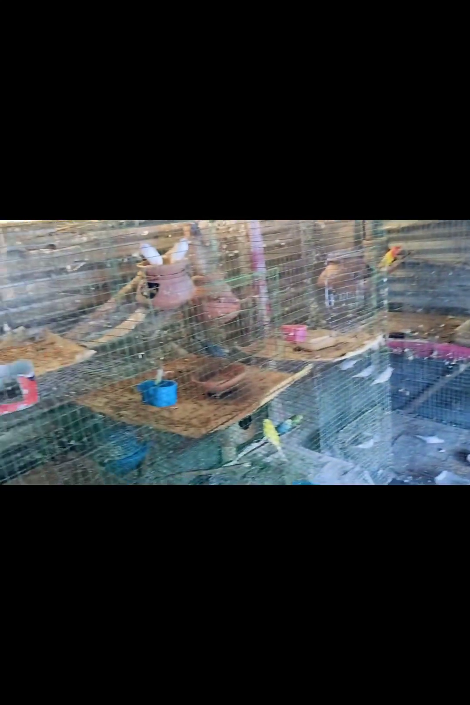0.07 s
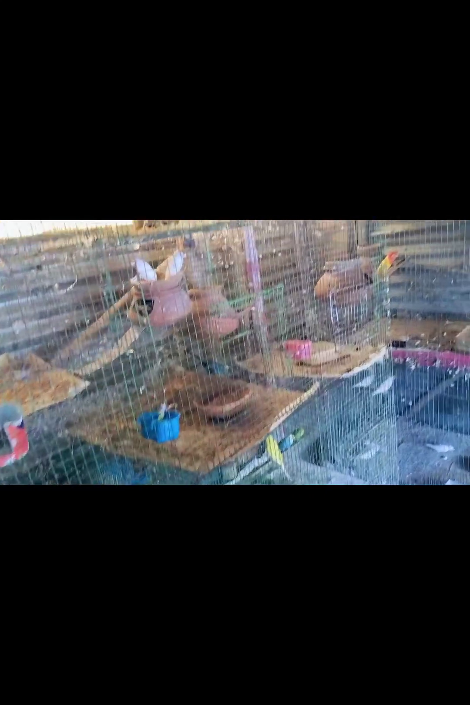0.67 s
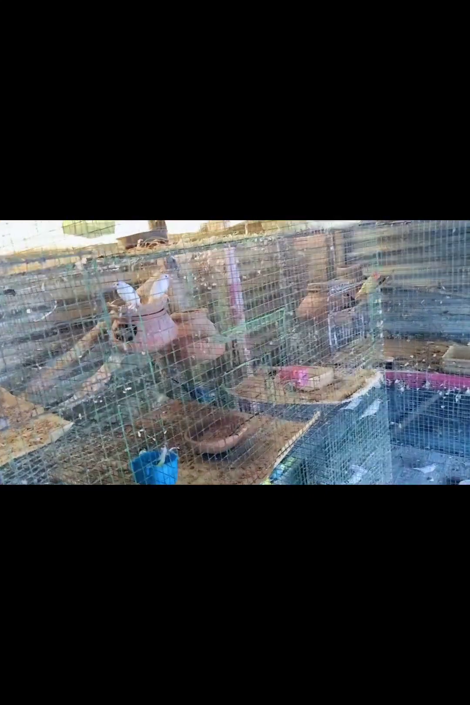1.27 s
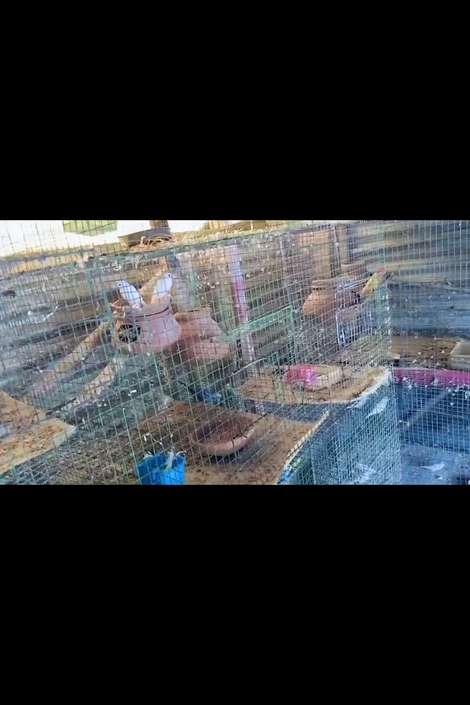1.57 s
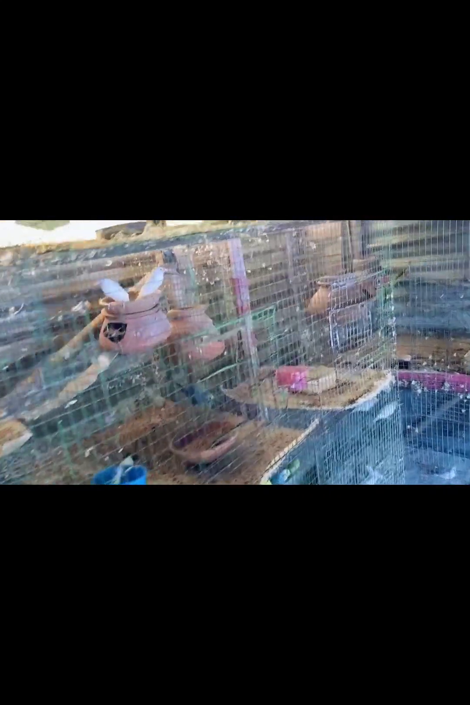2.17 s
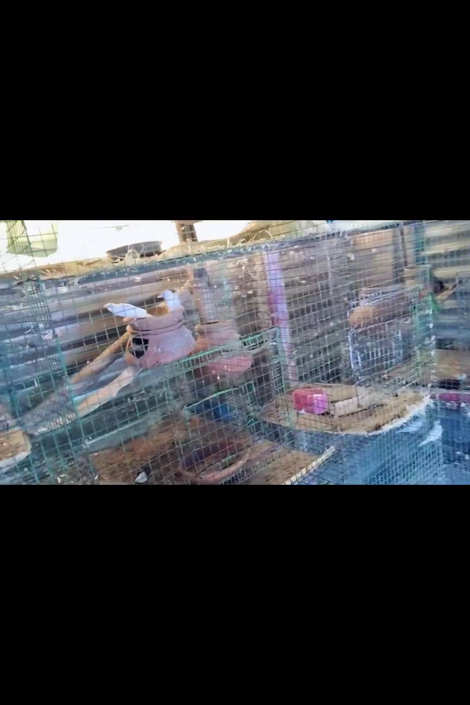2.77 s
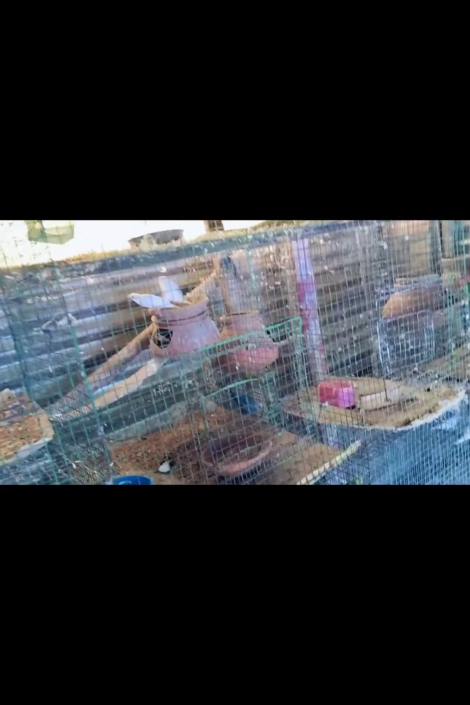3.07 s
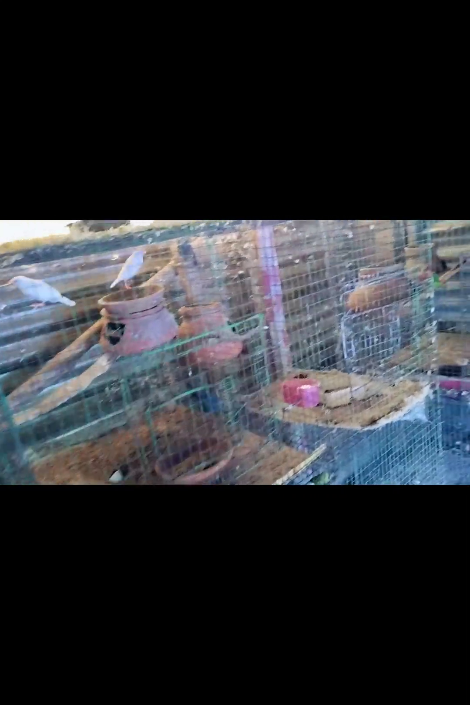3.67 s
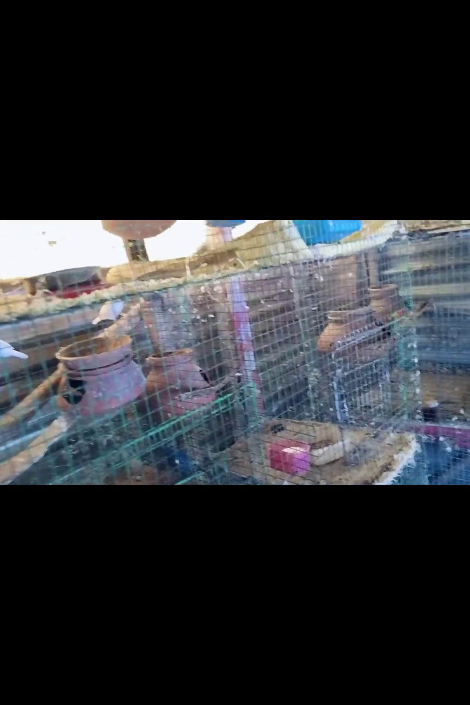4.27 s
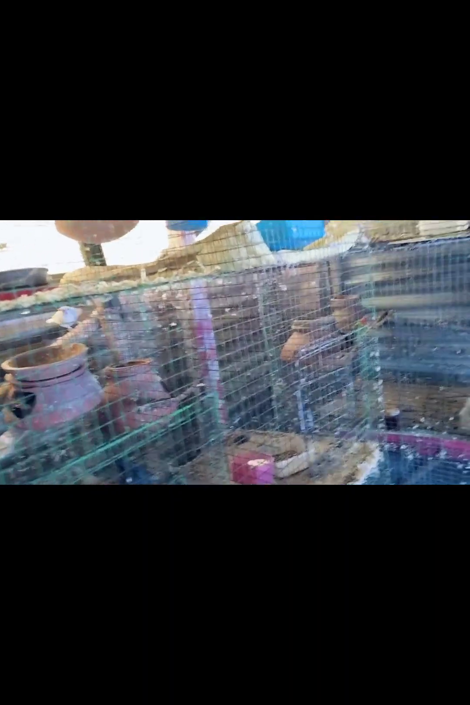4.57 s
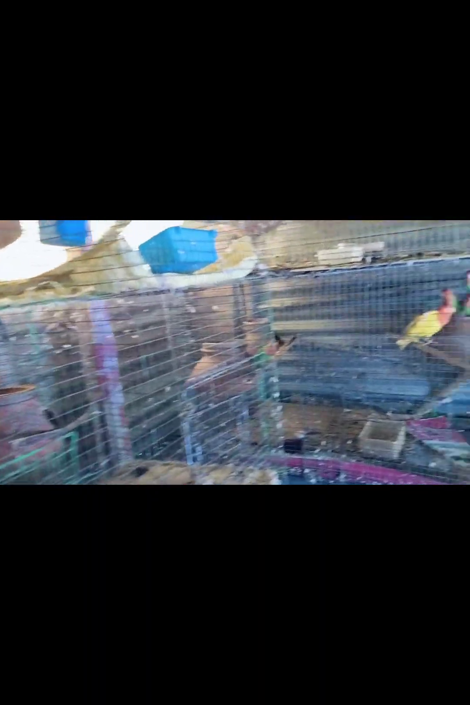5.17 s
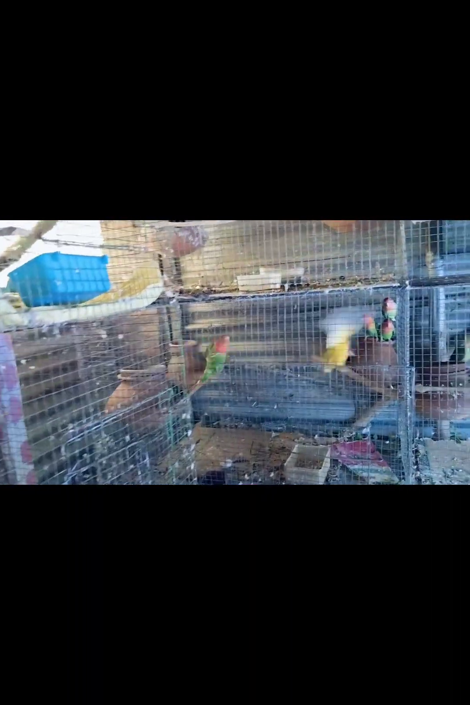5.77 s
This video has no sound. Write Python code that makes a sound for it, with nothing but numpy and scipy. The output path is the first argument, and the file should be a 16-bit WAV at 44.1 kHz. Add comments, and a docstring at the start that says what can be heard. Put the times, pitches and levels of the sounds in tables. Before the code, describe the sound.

Small parrots chirp, squawk and twitter in short high bursts in an outdoor aviary, over a faint low engine throb and a few soft knocks.

```python
"""Lovebirds in an outdoor aviary

Shrill double chirps, a thin whistle, buzzy squawks and raspy chips lead to a twittering run of peeps
and chatter. Each call is a membrane tone, coloured by throat and beak, that echoes in a cage of wire
mesh and sheet metal. Knocks, clicks and low handling thumps come between. Underneath lie a rumble that
swells with handling, grainy hiss, soft air, a hollow drone and the throb of a slow, distant engine."""
import sys
import numpy as np
from scipy import signal
from scipy.fft import rfft, irfft, next_fast_len
from scipy.io import wavfile

SR = 44100
rng = np.random.default_rng(int(sys.argv[2]) if len(sys.argv) > 2 else 0)


def digitize_waveform(pressure):
    """Quantize a signal to 16-bit integers and store it at the path in sys.argv[1].

    Rows of a 2-D input are taken as channels; values are limited to [-1, 1].
    """
    field = np.atleast_2d(pressure).T
    bounded = np.clip(field, -1, 1)
    quanta = np.round(bounded * 32767).astype(np.int16)
    wavfile.write(sys.argv[1], SR, quanta)


N = 264908
TIME = np.arange(N) / SR
CUTOFF_HZ = 15900


def from_db(db):
    """Decibels to gain."""
    return 10 ** (np.asarray(db) / 20)


def rms_one(x):
    """Scale to rms 1."""
    return x / np.sqrt(np.mean(x ** 2) + 1e-20)


def pan(db):
    """Stereo gains that put the left channel db above the right."""
    return from_db([[db / 2], [-db / 2]])


def at_hz(points, hz):
    """Read a spectrum on a log-frequency axis."""
    f, db = np.transpose(points)
    return np.interp(np.log(np.maximum(hz, 1)), np.log(f), db)


def progress(length):
    """Runs from 0 to 1 over a call."""
    return np.linspace(0, 1, int(length * SR))


def phase_of(hz):
    """Running phase of a moving frequency."""
    return 2 * np.pi * np.cumsum(hz) / SR


def add(out, start, sound):
    """Mix in a stereo sound; start is in seconds."""
    i = max(round(start * SR), 0)
    out[:, i:i + sound.shape[1]] += sound[:, :N - i]


def wobble(hz, size):
    """Random motion no faster than about hz; spread 1."""
    lowpass = signal.butter(2, min(hz, SR / 3), fs=SR, output="sos")
    run_in = SR // 10
    white = rng.standard_normal(run_in + max(size, SR // 4))
    return rms_one(signal.sosfilt(lowpass, white)[run_in:][:size])


def noise(spectrum, size=N):
    """Coloured stereo noise, centred in the bass and wide in the treble."""
    padded = next_fast_len(max(size, SR // 4))
    hz = np.arange(padded // 2 + 1) * SR / padded
    alike = 0.91 / (1 + (hz / 850) ** 2)
    mid, side = rfft(rng.standard_normal((2, padded)))
    stereo = np.sqrt(1 + alike) * mid + np.sqrt(1 - alike) * side * [[1], [-1]]
    return rms_one(irfft(stereo * from_db(at_hz(spectrum, hz)), padded)[:, :size])


def swelling(steady_db, rows):
    """Gain of a steady level with bell-shaped swells on top."""
    swells = (from_db(db) * np.exp(-((TIME - middle) / width) ** 2) for middle, width, db in rows)
    return np.sqrt(from_db(steady_db) ** 2 + sum(swell ** 2 for swell in swells))


# EQ curves of the four background beds: f/Hz, level/dB
RUMBLE_EQ = [(20, -6), (40, -7), (75, -3.5), (110, 3.5), (200, -21), (400, -41)]
AIR_EQ = [(130, -24), (230, 0.5), (340, -10), (430, -7.5), (530, -12), (680, -5), (1060, -9), (1540, -9),
          (4760, -19.5), (6500, -20.5), (15000, -65)]
DRONE_EQ = [(200, -24.5), (290, -5.5), (345, -17), (410, 2), (460, -11), (560, -24), (1000, -36)]
HISS_EQ = [(1500, -1), (3000, -0.5), (6000, -2), (9000, -16.5), (12000, -16), (16000, -38.5)]
# swells of handling rumble and of the drone near 400 Hz: peak t/s, half width/s, level/dB
RUMBLE_SWELLS = [(.4, .25, -52.5), (1.82, 0.13, -44), (2.15, .14, -49), (4.82, .05, -49),
                 (6.0, 0.11, -50.5)]
DRONE_SWELLS = [(2.09, .035, -43.5), (2.37, 0.052, -57.5), (3.62, 0.32, -60.5), (5.93, 0.25, -52)]
# hiss and air swell and fade together: peak t/s, half width/s, hiss level/dB, air level/dB
HISS_SWELLS = [(0.05, 0.23, -55.5, -58), (1.37, 0.11, -54, -52.5), (2.11, 0.19, -51, -64),
               (2.75, 0.24, -53.5, -76), (3.22, .06, -53, -54.5), (3.7, 0.36, -55, -59),
               (4.27, 0.086, -53.5, -52), (5.87, 0.094, -48, -48.5)]


def ambience(rumble_db=-57, air_db=-57, drone_db=-71, hiss_db=-77.5, grain_db=3):
    """Low rumble that swells with handling; soft air, a hollow drone and grainy hiss come and go."""
    middle, width, hiss_peak_db, air_peak_db = np.transpose(HISS_SWELLS)
    grains = rms_one(noise(HISS_EQ) * from_db(grain_db * wobble(60, N)))
    hiss = grains * swelling(hiss_db, zip(middle, width, hiss_peak_db))
    air = noise(AIR_EQ) * swelling(air_db, zip(middle, width, air_peak_db))
    rumble = noise(RUMBLE_EQ) * swelling(rumble_db, RUMBLE_SWELLS)
    drone = noise(DRONE_EQ) * swelling(drone_db, DRONE_SWELLS)
    return rumble + air + drone + hiss


# the engine's speed and level ride: t/s, firing rate/Hz, level/dB
ENGINE_RIDE = [(0, 19.65, -49), (2.4, 16.6, -53), (3.5, 16.45, -46), (5.3, 17.1, -49.5), (6.01, 17.6, -48)]
# exhaust resonances: f/Hz, bandwidth/Hz, relative level/dB
EXHAUST_MODES = [(144.8, 34.2, 0.5), (415.5, 27, -25.5)]
# swells in the throb: peak t/s, half width/s, level/dB
ENGINE_SURGES = [(0.999, 0.081, -42.5), (2.598, 0.33, -54), (3.05, 0.41, -50.5)]


def engine(uneven_db=2, pan_db=-3, churn=0.017):
    """Each firing thumps the exhaust resonances; distance leaves only the low throb."""
    times, rates, levels = np.transpose(ENGINE_RIDE)
    firing_hz, db = np.interp(TIME, times, rates), np.interp(TIME, times, levels)
    firings = np.diff(np.floor(np.cumsum(firing_hz) / SR), prepend=0)
    drive = firings * from_db(uneven_db * rng.standard_normal(N)) + churn * rng.standard_normal(N)
    throb = np.zeros(N)
    for hz, width, mode_db in EXHAUST_MODES:
        b, a = signal.iirpeak(hz, hz / width, fs=SR)
        throb += from_db(mode_db) * rms_one(signal.lfilter(b, a, signal.lfilter(b, a, drive)))
    return throb * swelling(db, ENGINE_SURGES) * pan(pan_db)


# formants of throat and beak: f/Hz, level/dB
BEAK_EQ = [(1200, 6.5), (2000, -10.5), (2700, -2), (4200, -3), (5500, 0), (6800, -10.5), (8000, -8.5),
           (9700, -14.5), (11200, -14), (12500, -6), (14000, -14.5), (16000, -22)]


def syrinx(pitch, rasp, overtone_db, flutter_hz=700, pitch_shake=0.058, split=0.089, gain_shake=0.34,
           slope_db=-16, breath_db=-26, low_cut_hz=2650, low_cut_share=0.85):
    """A membrane tone; rasp shakes its pitch and strength, adds subharmonics and stirs in breath."""
    size = len(pitch)
    phase = phase_of(pitch * (1 + pitch_shake * rasp * wobble(flutter_hz, size)))
    tone = np.zeros(size)
    for k in range(1, 9):
        db = at_hz(BEAK_EQ, k * pitch) + slope_db * np.log2(k) + overtone_db * (k > 1)
        tone += from_db(db) * np.sin(k * phase) * (k * pitch < CUTOFF_HZ)
    # strong and weak cycles alternate, which puts tones halfway between the harmonics
    growl = split * np.minimum(rasp, 1) * np.sin(phase / 2)
    strength = 1 + growl + gain_shake * rasp * wobble(2 * flutter_hz, size)
    breath = from_db(breath_db) * rasp * noise(BEAK_EQ, size)[0]
    # so small a throat radiates next to no low end
    corner_hz = min(low_cut_hz, low_cut_share * pitch.min())
    low_cut = signal.butter(6, corner_hz, "high", fs=SR, output="sos")
    return rms_one(signal.sosfilt(low_cut, rms_one(tone * strength) + breath))


def cage(call, pan_db, t60_s=0.26, walls_db=1, tail_db=3, gain_db=2.5, left_lag_s=0.00031):
    """A call arrives directly, as its own early echoes off metal sheets, and as a short diffuse tail."""
    t = TIME[:SR // 2]
    tail = rng.standard_normal((2, len(t))) * from_db(-60 * t / t60_s) * np.clip(t / 0.0057, 0, 1)
    walls = np.zeros((2, len(t)))
    for channel in walls:
        delays_s = rng.uniform(0.001, 0.018, size=8)
        channel[(delays_s * SR).astype(int)] = rng.standard_normal(len(delays_s))
    direct = np.pad(call, (0, len(t) - 1))
    out = np.array([np.roll(direct, round(left_lag_s * SR)), direct])
    for echoes, db in ((walls, walls_db), (tail, tail_db)):
        out += from_db(db) * direct.std() * rms_one(signal.fftconvolve(call[None], echoes, axes=1))
    out *= from_db(gain_db) * direct.std() / out.std(axis=1, keepdims=True)
    return out * pan(pan_db)


def note(pitch, rasp, db, attack, overtone_db, pan_db, buzz=0.093, buzz_hz=274, **throat):
    """A call swells, holds and closes, pulsed by buzz; db is its level going into the cage."""
    t = TIME[:len(pitch)]
    envelope = np.clip(t / attack, 0, 1) ** 1.1 * np.clip((1 - t / t[-1]) / 0.16, 0, 1)
    pulse_hz = buzz_hz * (1 + 0.29 * wobble(110, len(t)))
    pulses = rms_one(np.exp(buzz * np.sin(phase_of(pulse_hz))))
    voice = syrinx(pitch, rasp, overtone_db, **throat)
    return cage(from_db(db) * envelope * pulses * voice, pan_db)


def settling_calls(rows, detune, attack_s, trill_hz=261.7, jitter=0.28, clear_rasp=0.057, **throat):
    """Calls start rough and off pitch by the share detune, then settle; a fast trill makes them shrill."""
    out = np.zeros((2, N))
    for start, length, hz, db, onset_rasp, trill_start, trill_end, overtone_db, pan_db in rows:
        remaining = 1 - progress(length)
        unsettled = remaining ** 3.44  # the rough onset clears quickly
        trill = np.sin(phase_of(trill_hz * (1 + jitter * wobble(200, len(remaining)))))
        trill_depth = trill_end + (trill_start - trill_end) * unsettled
        pitch = hz * (1 + detune * remaining ** 2 + trill * trill_depth)
        rasp = clear_rasp + onset_rasp * unsettled
        add(out, start, note(pitch, rasp, db, attack_s, overtone_db, pan_db, **throat))
    return out


# chirp pairs, one clear and one harsh: t/s, length/s, f/Hz, level/dB, onset rasp,
# start and end trill depth (shares of f), overtones/dB, pan L-R/dB
CHIRP_CUES = [(0.189, .043, 4118, -13.5, 0.25, 0.13, .003, 2.5, 2),
              (0.250, 0.048, 4252, -16, 1.8, .07, 0.056, 1.5, -2),
              (3.886, 0.04, 4160, -12.5, .3, 0.2, 0.006, 2.5, 2.5),
              (3.947, 0.034, 4313, -10.5, 1.5, 0.083, .06, -5, -1.5)]


def chirps():
    """Loud, shrill chirps fall onto their pitch from above."""
    return settling_calls(CHIRP_CUES, detune=0.04, attack_s=0.014, pitch_shake=0.05, split=0.13,
                          breath_db=-35.5, slope_db=-15, buzz=0.099)


# knocks and handling thumps: t/s, thud level/dB, body level/dB, body f/Hz, click level/dB, main t60/s
KNOCK_CUES = [(0.434, -59, -51.5, 243, -55, 0.45), (1.019, -68, -43, 334, -46.5, 0.021),
              (1.777, -55.5, -53.5, 420, -54, 0.24), (1.831, -52.5, -56, 396, -45, 0.15),
              (1.886, -48, -58, 383, -49, 0.11), (1.981, -35, -56, 331, -33.5, 0.17),
              (2.066, -44.5, -49, 412, -60, 0.36), (2.321, -49, -66, 396, -50.5, 0.11),
              (2.792, -62, -74, 400, -84, 0.017), (4.070, -52, -43, 252, -46, 0.19),
              (5.296, -78.5, -51, 402, -63, 0.19)]
# EQ of the low thud and of the click: f/Hz, level/dB
THUD_EQ = [(30, -17), (70, 0), (170, 9), (300, -14), (600, -26)]
CLICK_EQ = [(400, -3.5), (1000, -1), (2700, 2.5), (4500, -5.5), (8000, -11.5), (15000, -62)]
# EQ of the hollow body: multiple of body f, level/dB
BODY_EQ = [(.35, -36), (.7, -61), (1, 28), (1.25, 12.5), (2.1, 10), (3.2, 11.5), (8, -36)]


def knocks(tail_db=-9):
    """Knocks, clicks and low handling thumps: a thud, a hollow body and a click die away together."""
    out, t = np.zeros((2, N)), TIME[:SR // 2]
    for start, thud_db, body_db, body_hz, click_db, t60 in KNOCK_CUES:
        body_eq = np.array(BODY_EQ) * [body_hz, 1]
        layers = (thud_db, THUD_EQ), (body_db, body_eq), (click_db, CLICK_EQ)
        hit = sum(from_db(db) * noise(eq, len(t)) for db, eq in layers)
        decay = from_db(-60 * t / t60) + from_db(tail_db - 60 * t / (3 * t60))
        add(out, start, hit * np.clip(t / 0.0014, 0, 1) * decay)
    return out


# a fading series of whistled notes: t/s, length/s, level/dB
WHISTLE_CUES = [(0.593, 0.087, -45.5), (0.713, 0.066, -48), (0.835, 0.065, -52), (0.955, 0.069, -52.5),
                (1.10, 0.071, -57)]


def whistle(hz=3880, arch=0.0228, ring_db=-4, ring_t60_s=0.48):
    """One bird pipes soft, nearly pure notes that arch slightly and ring into one another."""
    out, t = np.zeros((2, N)), TIME[:SR // 2]
    for start, length, db in WHISTLE_CUES:
        pitch = hz * (1 + arch * np.sin(np.pi * progress(length)))
        pipe = note(pitch, rasp=0.088, db=db, attack=0.005, overtone_db=-2, pan_db=0,
                    buzz=0.035, slope_db=-19)
        tail = rng.standard_normal((2, len(t))) * from_db(-60 * t / ring_t60_s)
        ring = signal.fftconvolve(pipe, tail, axes=1)
        add(out, start, pipe)
        add(out, start, from_db(ring_db) * ring * np.linalg.norm(pipe) / np.linalg.norm(ring))
    return out


# squawks and mutters: t/s, length/s, attack/s, start f/Hz, end f/Hz, level/dB, rasp,
# overtones/dB, pan L-R/dB
SQUAWK_CUES = [(1.124, 0.21, 0.088, 2200, 2090, -60, 0.17, -10, -3),
               (2.441, 0.18, 0.019, 1652, 1825, -46.5, 1.5, -9, -2),
               (3.187, 0.037, 0.0034, 1637, 1674, -47, 0.24, 8, -4),
               (3.501, 0.012, 0.0018, 2260, 2070, -34.5, 1.6, 5, -3),
               (3.513, 0.14, 0.01, 1970, 1670, -28, 1.6, 11, -2),
               (3.746, 0.017, 0.0078, 1395, 1500, -44.5, 0.6, 15.5, -8.5)]


def squawks():
    """Low calls, chopped into a buzz, whose pitch holds and then bends late."""
    out = np.zeros((2, N))
    for start, length, attack, start_hz, end_hz, db, rasp, overtone_db, pan_db in SQUAWK_CUES:
        pitch = start_hz + (end_hz - start_hz) * progress(length) ** 6
        add(out, start, note(pitch, rasp, db, attack, overtone_db, pan_db, buzz=1.0, buzz_hz=139.2,
                             pitch_shake=0.039, split=0.25, slope_db=-9.5, breath_db=-22.5))
    return out


# short chips: t/s, length/s, attack/s, start f/Hz, end f/Hz, level/dB, rasp, overtones/dB, pan L-R/dB
CHIP_CUES = [(1.38, 0.039, .005, 2816, 2430, -51, .6, -13, -11),
             (1.421, .037, 0.007, 2770, 3300, -45.5, 0.24, 17, -4),
             (2.532, 0.015, 0.004, 3980, 3620, -36.5, 1.3, 9, -1.5),
             (2.596, 0.007, 0.001, 3450, 3920, -18, 0.41, 6, -3),
             (2.661, 0.014, 0.0013, 3800, 3104, -21, 0.98, 6, -5),
             (3.809, 0.024, 0.0026, 3930, 4060, -28, 2.7, 7.5, -0.5),
             (5.094, 0.0252, 0.021, 2910, 3153, -23, 0.84, 26.5, -1),
             (5.106, 0.023, 0.0051, 4380, 4375, -18.5, 0.27, 3.5, -2),
             (5.207, 0.0382, 0.015, 4427, 4515, -20, 1.07, 8.5, -2.5)]


def chips():
    """Quick straight glides, raspy throughout."""
    out = np.zeros((2, N))
    for start, length, attack, start_hz, end_hz, db, rasp, overtone_db, pan_db in CHIP_CUES:
        pitch = start_hz + (end_hz - start_hz) * progress(length)
        add(out, start, note(pitch, rasp, db, attack, overtone_db, pan_db))
    return out


# notes that break downward: t/s, length/s, hold/s, upper f/Hz, lower f/Hz, mid-note level/dB, rasp,
# overtones after the break/dB, pan L-R/dB
CHATTER_CUES = [(2.88, 0.016, 0.0025, 3150, 2066, -30.5, 0.56, -0.5, -4.5),
                (5.16, 0.014, 0.0033, 3900, 1970, -32, 0.78, -16, -6),
                (5.354, 0.03, 0.01, 4480, 2583, -17.5, 1.13, 10, -2),
                (5.448, .038, .012, 4400, 2150, -16, 0.9, 19.5, -2),
                (5.536, 0.036, 0.013, 4200, 2225, -19.5, 0.62, 13.5, 0),
                (5.622, 0.031, 0.017, 4150, 2070, -22.5, 0.96, 14, -1.5)]


def chatter(upper_overtone_db=2, clearing=0.28, break_s=0.002, attack_s=0.0054, fade_db=9):
    """The voice holds a high note, then drops as far as an octave or so into a clearer register."""
    out = np.zeros((2, N))
    for start, length, hold, upper_hz, lower_hz, db, rasp, overtone_db, pan_db in CHATTER_CUES:
        elapsed = progress(length)
        dropped = 0.5 + 0.5 * np.tanh((length * elapsed - hold) / break_s)
        pitch = upper_hz + (lower_hz - upper_hz) * dropped
        overtones = upper_overtone_db + (overtone_db - upper_overtone_db) * dropped
        fading_db = db + fade_db * (0.5 - elapsed)
        add(out, start, note(pitch, rasp * (1 - clearing * dropped), fading_db, attack_s, overtones,
                             pan_db, pitch_shake=0.0625, breath_db=-24, slope_db=-14, low_cut_share=1.13))
    return out


# a run of rising peeps: t/s, length/s, final f/Hz, level/dB, onset rasp,
# start and end trill depth (shares of f), overtones/dB, pan L-R/dB
PEEP_CUES = [(4.484, 0.045, 3812, -18.5, 1.03, .02, .005, 6.5, -4),
             (4.590, 0.039, 3560, -17, 1.55, .05, .012, 5, -0.5),
             (4.686, 0.05, 3840, -16.5, 1.15, 0.027, .005, 8, -2.5),
             (4.794, 0.0424, 4017, -11, 0.41, 0.017, 0.0085, 3.5, -3),
             (4.891, 0.045, 4290, -14.5, 1.05, 0, 0.074, 9.5, 1),
             (4.996, 0.035, 4040, -13, 0.72, 0.0064, 0.059, 6.5, 0)]


def peeps():
    """Peeps climb to their pitch, with a subharmonic growl at the start."""
    return settling_calls(PEEP_CUES, detune=-0.067, attack_s=0.026, pitch_shake=0.022, split=0.23,
                          breath_db=-44, low_cut_hz=1770)


def scene():
    """The flock over the knocks, the engine and the background beds."""
    birds = chirps() + peeps() + chips() + chatter() + squawks() + whistle()
    return birds + knocks() + engine() + ambience()


def record(dry, ceiling=0.93):
    """A soft clip rounds the loudest peaks and a steep low-pass cuts the top."""
    rounded = dry / (1 + (dry / ceiling) ** 8) ** (1 / 8)
    return signal.sosfilt(signal.ellip(10, 0.1, 80, CUTOFF_HZ, fs=SR, output="sos"), rounded)


dry = scene()
out = record(dry)
digitize_waveform(out)
```